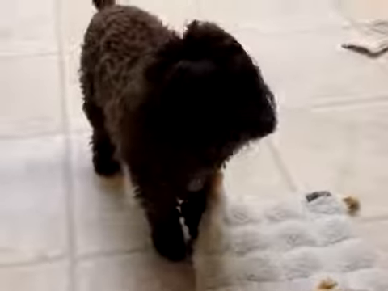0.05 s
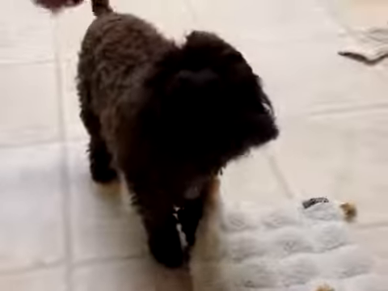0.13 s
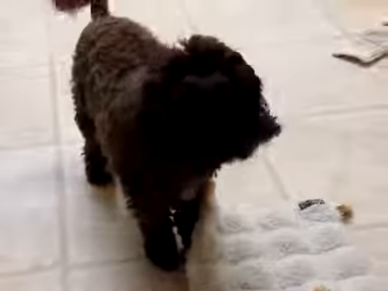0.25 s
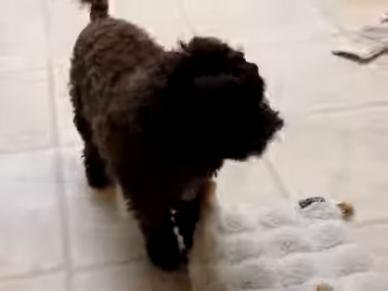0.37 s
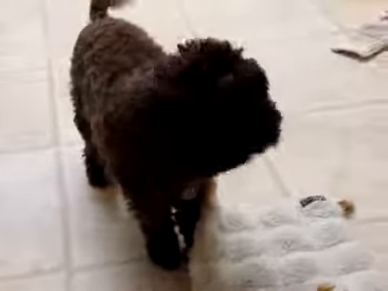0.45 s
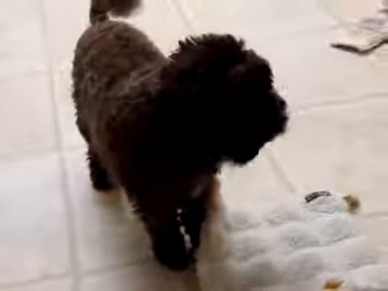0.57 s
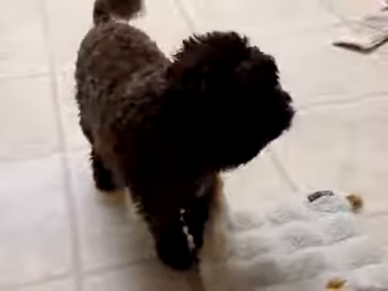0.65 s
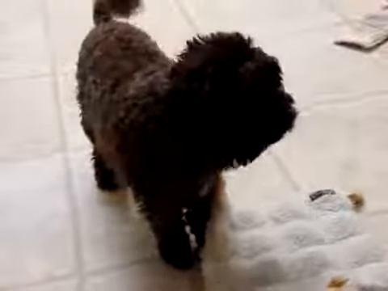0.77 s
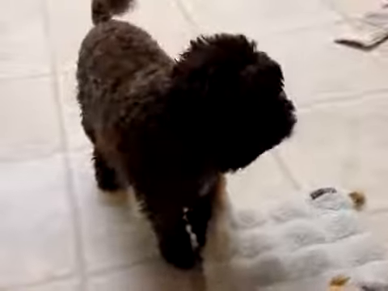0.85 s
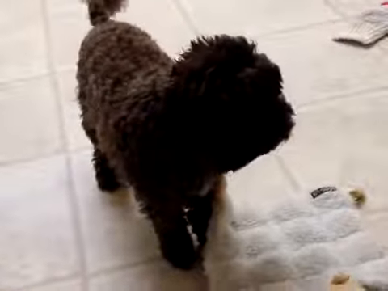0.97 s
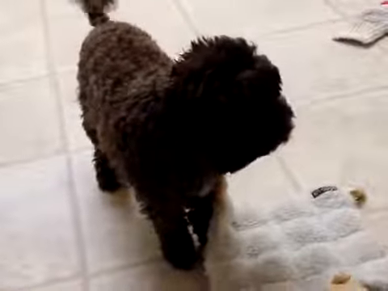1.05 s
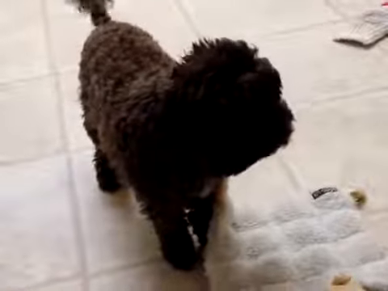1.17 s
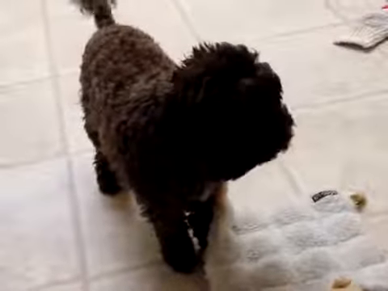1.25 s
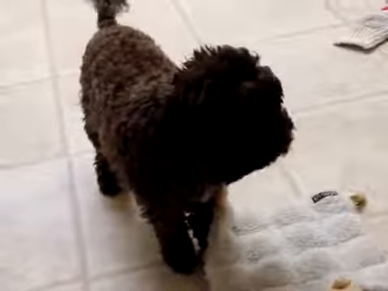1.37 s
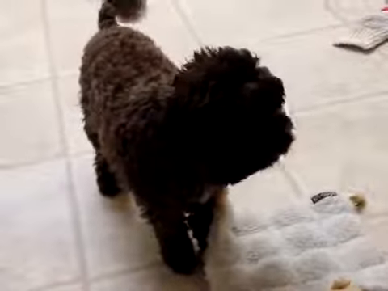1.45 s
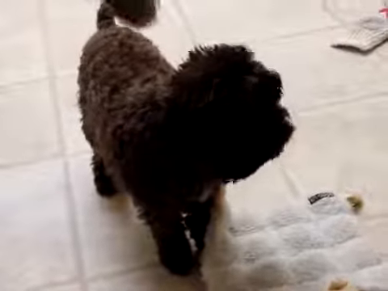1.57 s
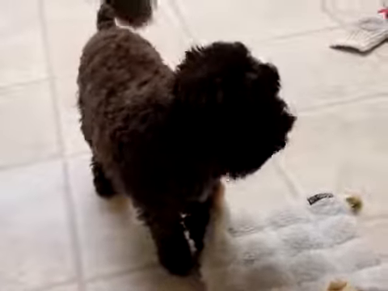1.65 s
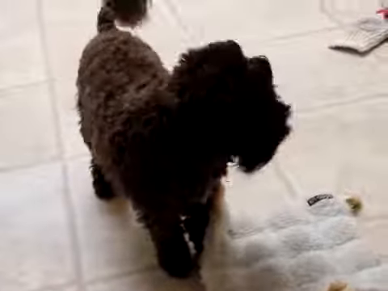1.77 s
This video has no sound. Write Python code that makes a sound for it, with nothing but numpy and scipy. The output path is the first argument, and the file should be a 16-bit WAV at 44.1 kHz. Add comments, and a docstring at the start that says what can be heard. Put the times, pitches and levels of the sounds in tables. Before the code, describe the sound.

A small dog's paws thud, slide and tick on a tiled floor in a ringing room, with two sharp clacks close by.

```python
"""A hard, ringing room with a tiled floor, where a small dog plays with a soft toy.
Its paws thud and knock in uneven runs, and each landing sets the floor and the room ringing.
Paws brush and slide over the tiles with a soft hiss, and claw tips tick lightly in between.
Twice something hard clacks and bounces right beside the microphone.
A faint background noise rises with each footfall or clack and sinks in the pauses."""
import sys
import numpy as np
from scipy import signal
from scipy.fft import rfft, irfft
from scipy.io import wavfile

SR = 44100
rng = np.random.default_rng(int(sys.argv[2]) if len(sys.argv) > 2 else 0)


def generate_wav(signal):
    """Clip the signal to [-1, 1] and save it as 16-bit WAV at the path in sys.argv[1]."""
    frames = np.transpose(np.atleast_2d(signal))
    scaled = np.clip(frames, -1, 1) * 32767
    pcm = np.round(scaled).astype(np.int16)
    wavfile.write(sys.argv[1], SR, pcm)


N = 288414
USUAL_WEIGHT_DB, USUAL_SCUFF_DB = -30, -44   # an ordinary footfall, to compare the others with


def from_db(db):
    """Turn decibels into a number to multiply a sound by."""
    return 10 ** (np.asarray(db) / 20)


def at_hz(table, hz):
    """Read between the rows of a table, giving every octave equal space."""
    pitches, values = np.transpose(table)
    return np.interp(np.log(np.maximum(hz, 1)), np.log(pitches), values)


def colour(table, size):
    """A gain for each pitch that makes noise duller or brighter but keeps its power."""
    gain = from_db(at_hz(table, np.fft.rfftfreq(size, 1 / SR)))
    return gain / np.sqrt(np.mean(gain ** 2))


def noise(gain, size):
    """Random noise with the given gain at each pitch."""
    return irfft(rfft(rng.standard_normal(size)) * gain, size)


def add(track, start_s, sound):
    """Mix a sound into the track from start_s on."""
    start = int(np.clip(round(start_s * SR), 0, N - 1))
    track[start:start + len(sound)] += sound[:N - start]


def resonate(push, pitch_hz, width_hz):
    """Ring at one pitch when pushed; the narrower the width, the longer the ring."""
    decay, angle = np.exp(-np.pi * width_hz / SR), 2 * np.pi * min(pitch_hz, SR / 2) / SR
    feedback = [1, -2 * decay * np.cos(angle), decay ** 2]
    return signal.lfilter(np.array([1, 0, -1]) * (1 - decay ** 2) / 2, feedback, push)


# The tone of the background: pitch_hz, level_db
BACKGROUND_TONE = [(30, -3), (120, 14), (450, 10), (1200, 8.5), (2500, 4), (6000, -2), (15500, -3.5)]
def background(sink_db_per_s=16.5):
    """A faint, dull noise that comes up with each footfall or clack and sinks in the pauses."""
    t = np.arange(N) / SR
    start_s, weight_db = np.transpose(sorted(tuple(row[:2]) for row in [*STEPS, *CLACKS]))
    latest = np.maximum(np.searchsorted(start_s, t) - 1, 0)
    lifted_db = -54 + 0.2 * (weight_db[latest] - USUAL_WEIGHT_DB)
    sunk_db = sink_db_per_s * (t - start_s[latest])
    return from_db(lifted_db - sunk_db) * noise(colour(BACKGROUND_TONE, N), N)


# The tone of a brush over the floor: pitch_hz, level_db
BRUSH_TONE = [(700, -11), (1500, 0.5), (3500, -4.5), (6200, 5.5), (9000, -12), (15000, -1)]
# Each brush: start_s, length_s, level_db
BRUSHES = [(0.0, 0.028, -45.5), (4.795, 0.082, -44), (6.204, 0.039, -41.5)]
def brushes():
    """Short rubs over the floor that swell and fade."""
    out = np.zeros(N)
    for start_s, length_s, level_db in BRUSHES:
        size = int(length_s * SR)
        swell = np.sin(np.linspace(0, np.pi, size))
        add(out, start_s, from_db(level_db) * noise(colour(BRUSH_TONE, size), size) * swell)
    return out


# How long the room's echo takes to fade by 60 dB: pitch_hz, fade_s
ECHO_FADES = [(60, 0.63), (200, 0.47), (500, 0.37), (1200, 0.4), (2200, 0.35), (5000, 0.34), (14000, 0.23)]
def room_echo(gain, size):
    """Many reflections blur into noise, and each octave dies away at its own rate."""
    t, hz = np.arange(size) / SR, np.fft.rfftfreq(size, 1 / SR)
    spectrum = rfft(rng.standard_normal(size)) * gain
    octave = np.round(np.log2(np.clip(hz, 64, 16384)))
    return sum(irfft(spectrum * (octave == k), size) * from_db(-60 * t / at_hz(ECHO_FADES, 2 ** k))
               for k in np.unique(octave))


# The notes that the floor and room ring with: pitch_hz, level_db, fade_s (to fall by 60 dB)
FLOOR_NOTES = [(116.2, 1.5, 0.55), (163.2, -9.5, 0.59), (183.6, -4, 0.66), (258.6, 3.5, 0.35),
               (307, 0, 0.32), (317.3, -10.5, 0.58), (426.6, 1, 0.37), (469.6, -0.5, 0.35), (643, -3, 0.32),
               (790, -7, 0.48), (826, -0.5, 0.31), (1224, -3, 0.52), (1524, -7, 0.35), (1799, -0.5, 0.25),
               (1820, -2.5, 0.15), (1950, -8, 0.22), (2244, 2.5, 0.46), (2417, 7.5, 0.19), (3520, 5, 0.41)]
def floor_blow(gain, size, rise_s=0.0045, bump_s=0.022, dull_above_hz=1800):
    """One blow on the floor: a short dull bump, the room's echo and notes that ring on."""
    t, hz = np.arange(size) / SR, np.fft.rfftfreq(size, 1 / SR)
    bump = noise(gain / np.hypot(1, hz / dull_above_hz), size) * np.exp(-t / bump_s)
    sound = room_echo(gain, size) + from_db(1) * bump
    for pitch_hz, level_db, fade_s in FLOOR_NOTES:
        # a note rings as strongly as the blow drives its pitch, and differently at each spot
        strength = np.interp(pitch_hz, hz, gain) * from_db(level_db - 21.5 + rng.normal(0, 1.8))
        note = np.sin(2 * np.pi * (pitch_hz * t + rng.random()))
        sound += strength * note * from_db(-60 * t / fade_s)
    return sound * (1 - np.exp(-(t / rise_s) ** 2))


def toes(hz, spread_s, count=4):
    """Toes land a moment apart, which adds power at some pitches and takes it from others."""
    delays_s, weights = spread_s * rng.random(count), from_db(rng.normal(0, 1.5, count))
    together = weights @ np.exp(-2j * np.pi * np.outer(delays_s, hz))
    return np.abs(together) ** 2 / np.sum(weights ** 2)


# The tones of the six parts of a landing, from low to high: pitch_hz, level_db
BOOM_TONE = [(25, -35), (55, -16.5), (100, -14.5), (160, 0.5), (230, -8), (330, -12), (600, -48)]
THUD_TONE = [(150, -35), (280, -1.5), (450, 2), (750, 0), (950, -4), (1150, -13.5), (1500, -30),
             (3500, -62.5)]
RAP_TONE = [(600, -37), (1000, -0.5), (1230, 3.5), (1450, 0), (1700, -7), (2400, -43.5)]
KNOCK_TONE = [(800, -30), (1400, -15), (1650, -5), (1900, 1.5), (2350, -8.5), (2700, -11), (3100, -18),
              (4500, -35.5), (10000, -63)]
CRACK_TONE = [(1500, -18), (3000, 4.5), (3600, 6), (5000, -4), (7000, -2), (10000, -20.5), (15500, -27)]
SCUFF_TONE = [(3000, -24.5), (7000, -3), (10000, -1), (15500, -1.5)]
def paw_landing(weight_db, hardness_db, scuff_db, size):
    """A landing's gain at each pitch: soft ones boom and thud, hard ones also rap, knock and crack."""
    def power(tone, level_db):
        return (from_db(level_db) * colour(tone, size)) ** 2

    boom = power(BOOM_TONE, -45 + 0.51 * (weight_db - USUAL_WEIGHT_DB))
    thud = power(THUD_TONE, weight_db - 3.5)
    rap = power(RAP_TONE, weight_db - 7 + 0.4 * hardness_db)
    knock = power(KNOCK_TONE, weight_db - 6.5 + hardness_db)
    # only the hardest blows crack, but a scuff crackles a little too
    crack = power(CRACK_TONE, max(weight_db - 35 + 2.91 * hardness_db, scuff_db - 6))
    scuff = power(SCUFF_TONE, scuff_db)
    ripple = toes(np.fft.rfftfreq(size, 1 / SR), spread_s=0.0059)
    return np.sqrt(boom + thud + rap + knock + ripple * (crack + scuff))


# Each footfall: start_s, weight_db, hardness_db, scuff_db, slide_s, spot_pitch_hz
STEPS = [(0.029, -34, -27, -43.5, 0.046, 653), (0.247, -21.5, -16.5, -66, 0.0093, 650),
         (0.292, -21, 10.5, -36.5, 0.14, 2265), (0.619, -18.5, 4, -45.5, 0.048, 1828),
         (0.911, -20.5, -17, -52.5, 0.27, 769), (1.04, -42.5, -6.5, -51, 0.0017, 566),
         (1.304, -23, 2.5, -34.5, .12, 1193), (1.678, -23, -8, -46, 0.099, 646.3),
         (2.049, -27.5, -16, -48.5, 0.083, 648), (2.42, -38.5, -7, -45, .15, 2260),
         (2.495, -37.5, -27, -50, 0, 633), (2.638, -42, -30, -70, 0.00027, 778),
         (2.736, -33.5, -10.5, -38.5, .1, 826), (2.859, -37, -30, -50, 0, 680),
         (2.939, -37.5, -26, -85, 0.034, 746.7), (3.005, -25.5, -1.5, -37.5, .11, 1906),
         (3.529, -49, -15, -52, 0.0066, 528), (3.771, -50.5, -1, -47, 0.028, 1230),
         (3.841, -46.5, -9, -50, 0.033, 787.6), (4.136, -36, -22, -47, 0.12, 652),
         (4.203, -38.5, -34, -51, 0.012, 856), (4.461, -22, -5, -36.5, 0.15, 1227),
         (4.93, -58.5, 4.5, -68, 0.039, 792.6), (5.019, -50.5, -19, -61, 0.034, 800),
         (5.294, -33.5, -14, -43, .08, 643), (5.506, -38, -16, -74, 0, 877.5),
         (5.586, -33, -4.5, -44.5, 0.16, 670), (5.66, -35, -25.5, -45, 0.011, 819),
         (5.826, -41.5, -19, -68, 0.025, 767), (5.897, -23, 2, -42, 0.1, 1853),
         (6.127, -36, -20, -76, 0.0047, 887.5), (6.227, -30, -19, -49, 0.16, 790),
         (6.346, -40, -19, -62, 0.00067, 826)]
def footfalls(spot_boost_db=6.5, spot_octaves=0.072, spot_fade_s=0.46, size=24576):
    """Paws strike the tiles; each spot of the floor favours one pitch, which lingers."""
    out, t, hz = np.zeros(N), np.arange(size) / SR, np.fft.rfftfreq(size, 1 / SR)
    for start_s, weight_db, hardness_db, scuff_db, _, spot_hz in STEPS:
        near_spot_pitch = np.exp(-(np.log2((hz + 1) / spot_hz) / spot_octaves) ** 2)
        gain = paw_landing(weight_db, hardness_db, scuff_db, size)
        gain *= from_db(spot_boost_db * near_spot_pitch)
        ring_db = -30.5 + 0.55 * (scuff_db - USUAL_SCUFF_DB)   # louder when the claws dig in
        ring = from_db(ring_db - 60 * t / spot_fade_s) * np.sin(2 * np.pi * spot_hz * t)
        add(out, start_s, np.interp(spot_hz, hz, gain) * ring)
        add(out, start_s - .003, floor_blow(gain, size))
    return out


# The tone of a sliding paw: pitch_hz, level_db
SLIDE_TONE = [(30, -11.5), (120, 7.5), (500, 13), (1200, 4), (2500, -4), (5000, -4.5), (10000, -7.5),
              (15500, -7)]
def slides(rise_s=0.023, fade_s=0.5, grit_db=1.26, ripple_share=0.94, size=32768):
    """Where a paw slides on after landing, a gritty hiss builds up, holds, then fades."""
    out, t, hz = np.zeros(N), np.arange(size) / SR, np.fft.rfftfreq(size, 1 / SR)
    for start_s, _, _, scuff_db, slide_s, _ in STEPS:
        if slide_s < .02:
            continue
        ripple = 1 - ripple_share + ripple_share * toes(hz, spread_s=0.0032)
        rub = noise(colour(SLIDE_TONE, size) * np.sqrt(ripple), size)
        grit = noise(colour([(150, 8.0), (600, -30.5), (3000, -58.5)], size), size)
        level_db = -44 + 0.35 * (scuff_db - USUAL_SCUFF_DB)
        fade_db = -60 * np.maximum(t - slide_s, 0) / fade_s
        loudness = (1 - np.exp(-t / rise_s)) * from_db(level_db + fade_db + grit_db * grit)
        add(out, start_s - .008, rub * loudness)   # begins at first touch, just before the blow
    return out


# The clearer claw ticks: start_s, level_db, pitch_hz
CLAW_TICKS = [(0.7817, -25, 2850), (1.0147, -35, 5485), (1.1484, -32, 5400), (1.2142, -45, 5400.0),
              (1.2816, -39.5, 5450.0), (1.415, -32, 5530.0), (1.5839, -40.5, 2890), (1.6148, -39.5, 2524),
              (1.9491, -31.5, 5420), (2.5791, -33, 7360.0), (2.7657, -20.5, 7600), (3.3928, -34, 11000),
              (3.418, -30, 13400), (4.2099, -32.5, 3070), (4.5856, -35.5, 5570), (4.7188, -35, 5430.0),
              (4.7467, -43.5, 4130.0), (4.852, -38, 5450.0), (4.9857, -38.5, 5430.0), (5.1189, -38.5, 5476),
              (5.6866, -34, 5443)]
def claw_ticks(boost_db=2, faint_count=10, contact_s=0.0019, width_share=0.84, size=8192):
    """A claw tip gives a sharp tap with a trace of grit, a brief ring and a thin snap on top."""
    out, t = np.zeros(N), np.arange(size) / SR
    # claws that barely touch, at random moments
    faint = [(when * N / SR, -52 + 4 * force, 5400) for when, force in rng.random((faint_count, 2))]
    for start_s, level_db, pitch_hz in [*CLAW_TICKS, *faint]:
        grit = rng.standard_normal(size) * np.exp(-t / contact_s)
        touch = 6 * signal.unit_impulse(size) + grit + from_db(-33.5) * room_echo(1.0, size)
        width_hz = width_share * pitch_hz
        tap = resonate(resonate(touch, pitch_hz, width_hz), pitch_hz, 2 * width_hz)
        ring = from_db(7.5) * resonate(touch, pitch_hz, width_hz=560)
        snap = from_db(-15.5) * resonate(touch, min(2 * pitch_hz, 12800), width_hz=pitch_hz / 2)
        tick = tap + ring + snap
        add(out, start_s, from_db(level_db + boost_db) * tick / np.abs(tick).max())
    return out


# The hard thing's notes besides its hollow ring: pitch_hz, width_hz, level_db
CLACK_NOTES = [(540, 160, -5.5), (906, 110, 1), (2280, 500, -20.5), (4620, 150, -0.5), (5660, 510, -8),
               (7430, 570, -4), (8600, 480, -7.5), (10330, 1100, -3.5), (13130, 1900, -11.5)]
# The notes that hang on after a clack: times_ring_pitch, width_hz, level_db
AFTER_NOTES = [(1.004, 71.5, 4.5), (3.019, 261, 2)]
def hard_contact(ring_hz, bright_db, body_db, contact_s=0.0028, echo_rise_s=0.011, size=32768):
    """One short, gritty contact sets the hard thing ringing, and the room answers faintly."""
    t = np.arange(size) / SR
    grit = rng.standard_normal(size) * np.exp(-t / contact_s)
    echo_rise = 1 - np.exp(-(t / echo_rise_s) ** 2)
    echo = from_db(-25.5) * room_echo(0.9, size) * echo_rise
    # the push drives the low notes, the scrape the high ones
    push = 11 * signal.unit_impulse(size) + .5 * grit + echo
    scrape = from_db(bright_db) * (grit + from_db(-6.5) * echo)
    sound = from_db(6) * resonate(push, ring_hz, width_hz=140)
    for k, (pitch_hz, width_hz, level_db) in enumerate(CLACK_NOTES):
        drive = scrape if pitch_hz > ring_hz else from_db(body_db) * push
        sound += (-1) ** k * from_db(level_db) * resonate(drive, pitch_hz, width_hz)
    for times_ring_pitch, width_hz, level_db in AFTER_NOTES:
        sound += from_db(level_db) * resonate(echo, times_ring_pitch * ring_hz, width_hz)
    room_thud = from_db(body_db - 45) * room_echo(colour(THUD_TONE, size), size) * echo_rise
    return sound + room_thud


# Each clack: start_s, level_db, ring_hz, bright_db, body_db, graze_db, gap_s, bounce_loss_db
CLACKS = [(3.2117, -2.5, 1557, 4.5, 1, -2.5, .0025, 1), (6.51, 0.5, 1707, 2.5, -6.5, -28, .0031, 7.5)]
def clacks(boost_db=6, pitch_scatter=0.036):
    """Something hard grazes, hits and bounces twice; its hollow ring shifts a little each time."""
    out, contacts = np.zeros(N), []
    for start_s, level_db, ring_hz, bright_db, body_db, graze_db, gap_s, bounce_loss_db in CLACKS:
        graze = (start_s - gap_s, level_db + graze_db)
        hits = [(start_s + k * gap_s, level_db - k * bounce_loss_db) for k in range(3)]
        for hit_s, hit_db in [graze, *hits]:
            pitch_hz = ring_hz * (1 + pitch_scatter * rng.uniform(-1, 1))
            contacts.append((hit_s, hit_db, pitch_hz, bright_db, body_db))
    for hit_s, hit_db, pitch_hz, bright_db, body_db in contacts:
        add(out, hit_s, from_db(hit_db + boost_db) * hard_contact(pitch_hz, bright_db, body_db))
    return out


def scene():
    """All the sounds meet at one microphone."""
    knocks = footfalls() + clacks() + claw_ticks()
    rubs = slides() + brushes()
    return (knocks + rubs + background())[None, :]


def record(dry, ceiling=.85, cutoff_hz=16200):
    """Round off the loudest peaks and cut the very highest pitches."""
    rounded = ceiling * np.tanh(dry / ceiling)
    return signal.sosfilt(signal.ellip(10, .2, 80, cutoff_hz, fs=SR, output="sos"), rounded)


dry = scene()
out = record(dry)
generate_wav(out)
```